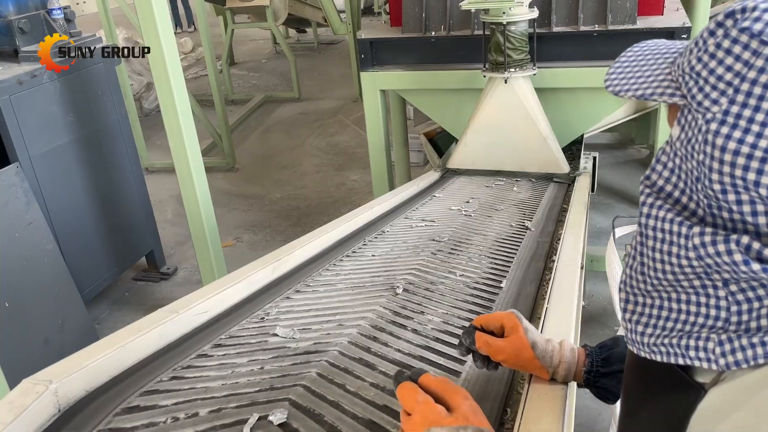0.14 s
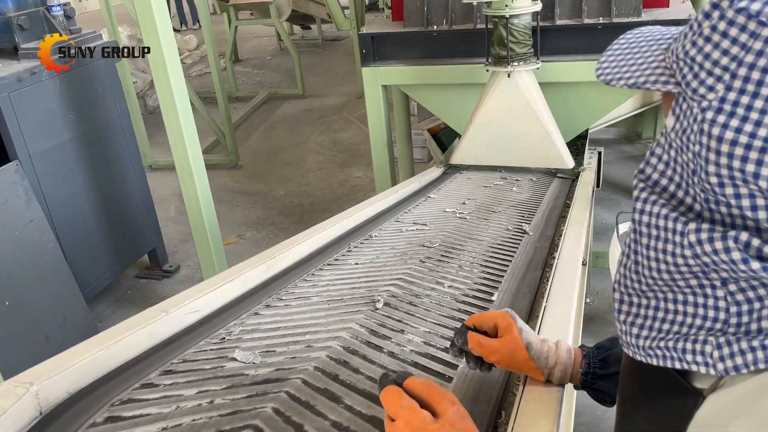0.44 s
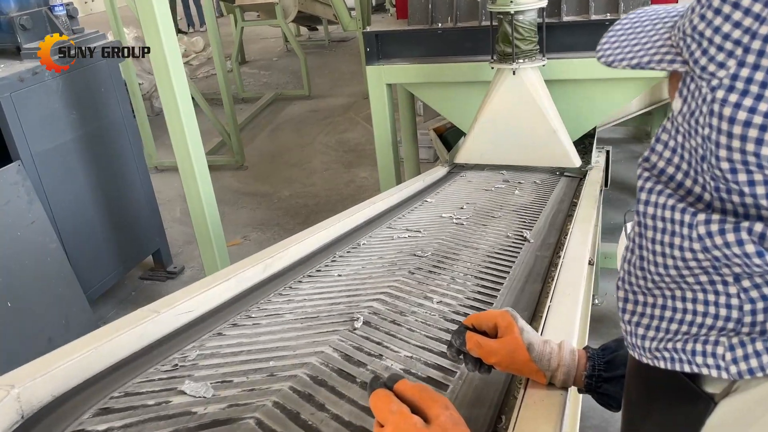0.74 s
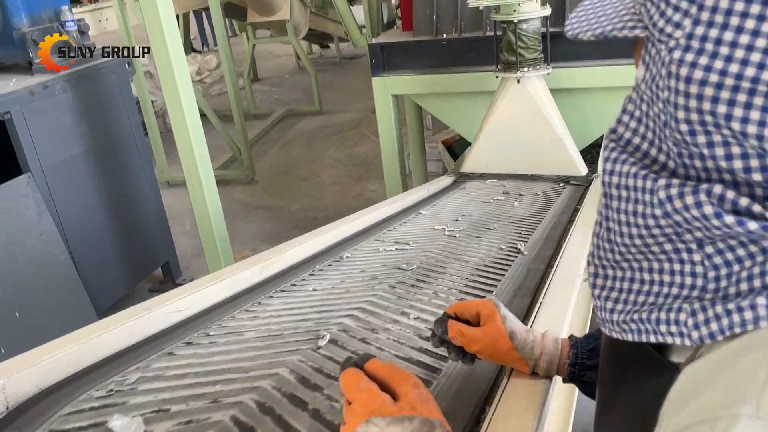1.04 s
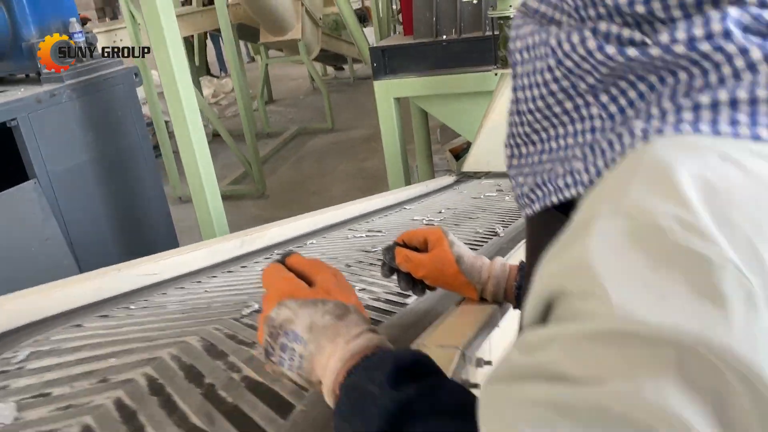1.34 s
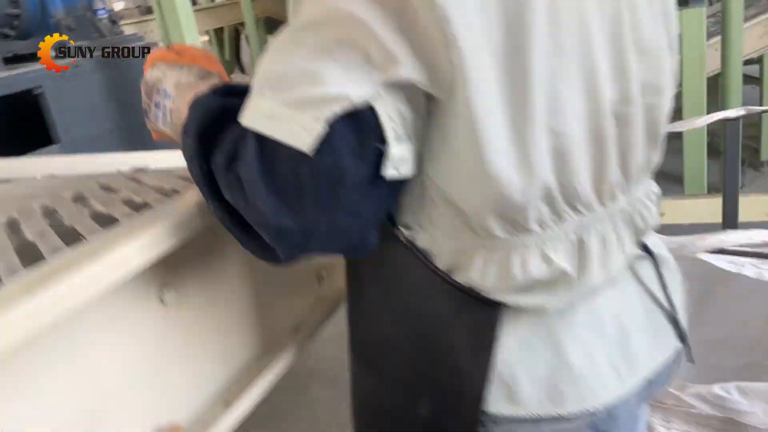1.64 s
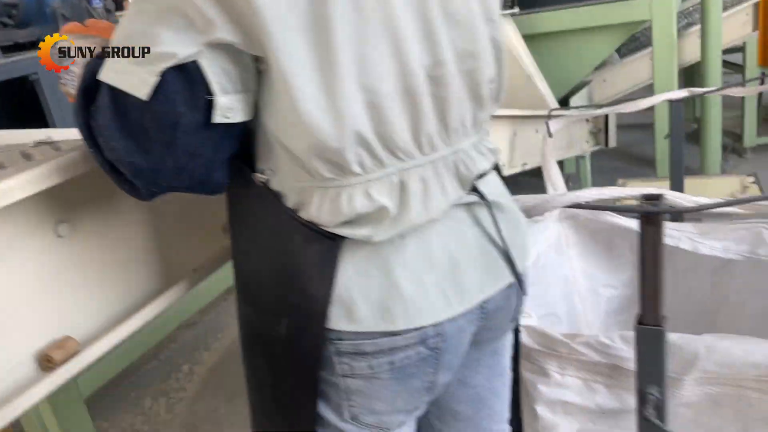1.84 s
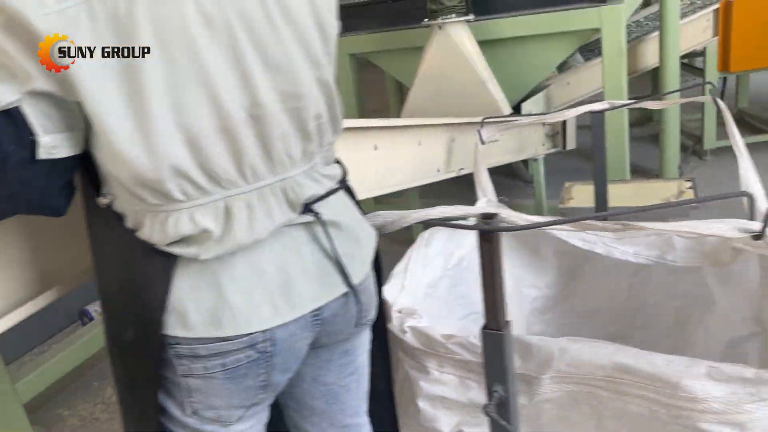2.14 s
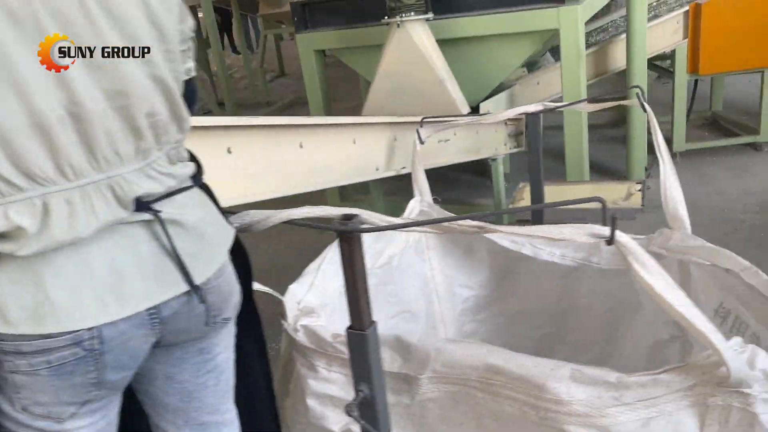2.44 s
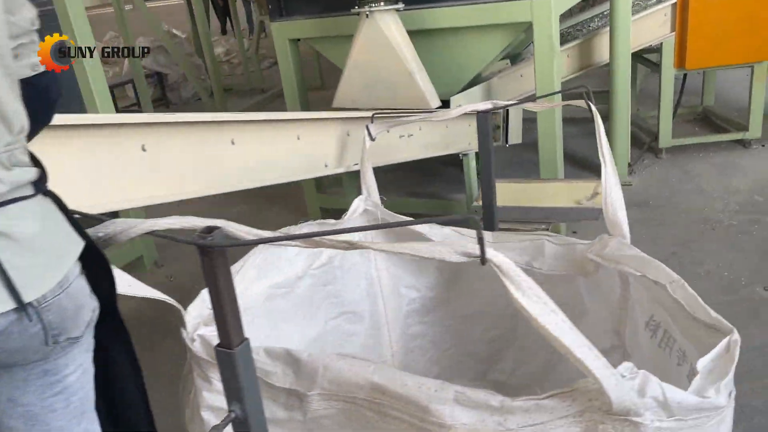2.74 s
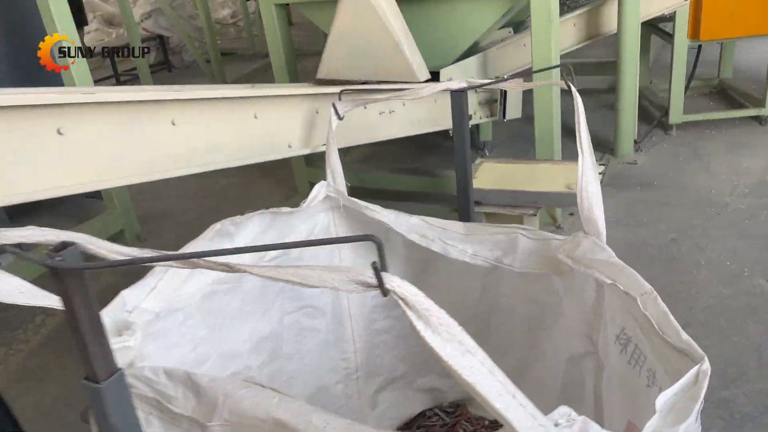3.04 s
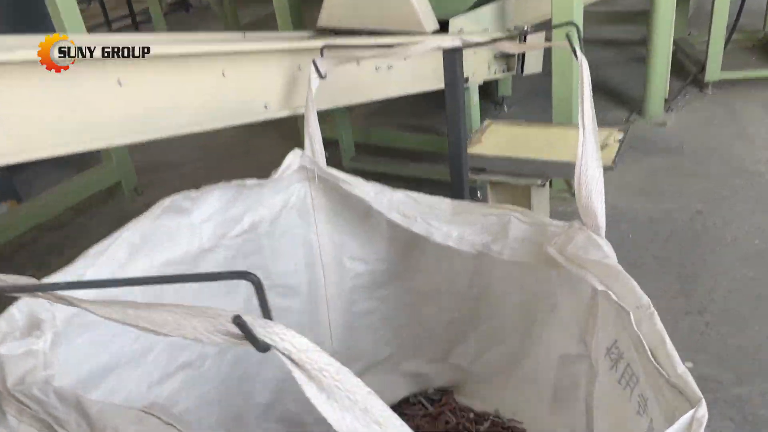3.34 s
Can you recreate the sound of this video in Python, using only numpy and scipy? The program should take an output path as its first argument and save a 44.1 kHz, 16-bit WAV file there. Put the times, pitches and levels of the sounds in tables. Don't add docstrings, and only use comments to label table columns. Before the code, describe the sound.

Metal pieces rattle and clang down a sorting line while motors hum and roar behind

```python
import sys
import numpy as np
from scipy import signal
from scipy.fft import rfft, irfft, next_fast_len
from scipy.io import wavfile
from scipy.ndimage import uniform_filter1d, map_coordinates

SR = 44100
rng = np.random.default_rng(int(sys.argv[2]) if len(sys.argv) > 2 else 0)


def wrap_up_sound(samples):
    columns = np.atleast_2d(samples).T
    tamed = np.clip(columns, -1, 1)
    steps = np.round(tamed * 32767).astype(np.int16)
    wavfile.write(sys.argv[1], SR, steps)


def convert_level_to_amplitude(level_db):
    exponent = np.asarray(level_db, float) / 20
    return 10 ** exponent


N = 154350
TIME_S = np.arange(N) / SR


def rms_one(x):
    return x / np.sqrt(np.mean(x ** 2) + 1e-20)


def at_hz(points, hz):
    table = np.array(points)
    return np.interp(np.log(hz), np.log(table[:, 0]), table[:, 1])


def drift(rate_hz):
    r = np.exp(-80 * np.pi * rate_hz / SR)
    noise = rng.standard_normal(N // 40 + 2002)
    slow = signal.lfilter([1], [1, -2 * r, r * r], noise)[2000:]
    return np.interp(np.arange(N) / 40, np.arange(len(slow)), rms_one(slow - slow.mean()))


def ring(x, hz, width_hz):
    r = np.exp(-np.pi * width_hz / SR)
    poles = [1, -2 * r * np.cos(2 * np.pi * hz / SR), r * r]
    return signal.lfilter([(1 - r * r) / 2, 0, (r * r - 1) / 2], poles, x)


def high_pass(x, hz):
    return signal.sosfilt(signal.butter(2, hz, "high", fs=SR, output="sos"), x)


# (time [s], tinkle level [dB], clank level [dB], pour length [s])
BATCHES = [(-.05, -5, 0, 0.068), (.03, -10, -2.5, 0.023), (.1, -17, -10, 0.044), (.17, -21, -6, 0.073),
           (0.296, -1.5, -5, 0.046), (.23, -19, -5, 0.032), (.33, -9, -4, 0.025), (.41, -0.5, -2.5, 0.084),
           (.48, -8, 3.5, 0.022), (0.578, 0, 2.5, 0.081), (.74, -7.5, -1.5, 0.034), (0.887, -2, 2, 0.054),
           (.93, 0, -2, 0.033), (1.072, -2.5, 2, 0.071), (1.15, -1, -1.5, 0.09), (1.26, -20, -6, 0.043),
           (1.40, -5, 2, 0.043), (1.48, -5, 0, 0.059), (1.54, -2.5, -2, 0.056), (1.65, -2, -1, 0.074),
           (1.72, -9, 1, 0.1), (1.91, -3.5, 2.5, 0.049), (2.171, -5.5, 1, 0.1), (2.24, -2.5, -0.5, 0.078),
           (2.33, 1, -3, 0.061), (2.493, 5, 2, 0.029), (2.526, 1.5, 3, 0.042), (2.595, -2.5, 1, 0.033),
           (2.725, 4, 4.5, 0.019), (2.75, -2.5, 3.5, 0.034), (3.018, -3, -1.5, 0.076),
           (3.18, 3, -2.5, 0.044), (3.255, -7, 4, 0.042), (3.40, -6, -10, .1)]
POUR_FADE_S = 0.02


def shower(column, rise_s):
    power = np.zeros(N)
    for batch in BATCHES:
        age_s = np.maximum(TIME_S - batch[0], 0)
        rise = (1 - np.exp(-age_s / rise_s)) ** 2
        fade = np.exp(-np.maximum(age_s - batch[3], 0) / POUR_FADE_S)
        power += convert_level_to_amplitude(2 * batch[column]) * rise * fade
    return np.sqrt(power)


PIECES_PER_S, SIZE_SPREAD_DB = 18000, 4
PIECE_SWING_DB, PIECE_CHANGE_S = 3.5, 0.04


def scrap(strength, colour, ring_cycles, count):
    size_db = SIZE_SPREAD_DB * np.minimum(rng.exponential(1, N), 4)
    impacts = convert_level_to_amplitude(size_db) * rng.choice([-1, 1], N)
    landed = rng.random(N) < PIECES_PER_S / SR
    clicks = impacts * landed * strength + 1e-18

    struck = rng.integers(0, count, N)
    spell = (TIME_S / PIECE_CHANGE_S + struck / count).astype(int)
    swing = convert_level_to_amplitude(PIECE_SWING_DB * rng.standard_normal((400, count)))
    clicks = clicks * swing[np.minimum(spell, 399), struck]

    pitches_hz = np.geomspace(colour[0][0], colour[-1][0], count) * rng.uniform(0.97, 1.02, count)
    rings = np.zeros(N)
    for k, hz in enumerate(pitches_hz):
        rings += convert_level_to_amplitude(at_hz(colour, hz)) * ring(clicks * (struck == k), hz, 2 * hz / ring_cycles)
    return rms_one(rings) * np.sqrt(np.mean(strength ** 2))


WAVER_S, WAVER_RATE_HZ = 0.0016, 2.5


def waver(x):
    read_at = np.arange(N) + WAVER_S * SR * drift(WAVER_RATE_HZ)
    return map_coordinates(x, [read_at], order=3, mode="nearest")


# (frequency [Hz], level [dB])
TINKLE_COLOUR = [(2500, 1.5), (4000, -1), (5500, -1.5), (7000, -2.5), (9000, -6.5), (12000, -13),
                 (16000, -30)]
# (frequency [Hz], level [dB])
CLANK_COLOUR = [(600, 6), (950, 10), (1400, 5.5), (2500, 4.5), (4000, 5), (5500, -1.5), (7500, -18)]
TINKLE_DB, TINKLE_RISE_S, TINKLE_CYCLES = -31, 0.00067, 43
CLANK_DB, CLANK_RISE_S, CLANK_CYCLES = -30, 0.0045, 37.4


def falling_scrap():
    light, heavy = shower(1, TINKLE_RISE_S), shower(2, CLANK_RISE_S)
    sides = []
    for _ in range(2):
        tinkles = convert_level_to_amplitude(TINKLE_DB) * scrap(light, TINKLE_COLOUR, TINKLE_CYCLES, count=44)
        clanks = convert_level_to_amplitude(CLANK_DB) * scrap(heavy, CLANK_COLOUR, CLANK_CYCLES, count=40)
        sides.append(waver(tinkles + clanks))
    return np.array(sides)


# (time [s], level [dB], pitch [Hz])
LARGE_PIECES = [(0.477, -35.0, 1850), (0.483, -39, 2885), (0.576, -33.0, 2606), (0.582, -29.5, 2190),
                (0.585, -28.5, 883), (0.605, -39, 3800), (0.623, -39, 3445), (0.628, -32, 2565),
                (0.643, -33, 1860), (0.756, -32, 558), (0.892, -34, 1510), (0.907, -32, 4000),
                (0.919, -40, 3445), (0.936, -36, 1658), (0.951, -28, 1148), (1.023, -30, 405),
                (1.2, -32, 2530), (1.613, -32, 2630), (1.673, -33, 2778), (1.694, -31.5, 1857),
                (1.821, -27, 381), (1.958, -32, 1981), (1.978, -31, 1360), (2.236, -34, 3359),
                (2.273, -33, 1800), (2.322, -32, 1766), (2.329, -32, 1056), (2.364, -37.0, 4479),
                (2.379, -32.5, 1073), (2.48, -30.5, 2850), (2.495, -36.0, 3854), (2.5, -37, 3144),
                (2.512, -34.0, 1905), (2.517, -33, 1766), (2.526, -35.0, 4544), (2.529, -28, 1264),
                (2.532, -32, 866), (2.541, -34.0, 3630), (2.541, -31.0, 1052), (2.541, -26, 1442),
                (2.553, -34.0, 3467), (2.567, -32, 4220), (2.595, -28.5, 1706), (2.595, -33, 1554),
                (2.599, -28.0, 996), (2.622, -30, 2400), (2.672, -33.0, 2070), (2.73, -27, 1077),
                (2.737, -36, 3230), (2.75, -36, 2476), (2.752, -41, 2710), (2.756, -34.0, 1533),
                (2.766, -36, 3058), (3.193, -31, 1538), (3.249, -28.5, 1257), (3.287, -40, 847),
                (3.299, -34.0, 1946), (3.339, -31, 1227),
                (0.033, -37, 755), (0.051, -33.0, 578), (0.112, -27.5, 389.5), (0.469, -29, 465),
               (0.541, -31.0, 500), (0.567, -35, 783), (0.602, -36, 690), (0.623, -31, 394),
               (0.649, -36, 660), (0.66, -32, 451), (0.73, -33.0, 782), (0.916, -33.0, 507),
               (0.919, -27, 247), (0.933, -31.5, 399), (0.939, -33.0, 793), (0.948, -33.0, 743),
               (1.067, -33, 328), (1.142, -30.5, 643), (1.427, -32.5, 538), (1.577, -32.5, 767),
               (1.647, -36, 626), (1.656, -34, 670), (1.717, -28.5, 364), (1.731, -32.0, 480),
               (2.28, -39, 633), (2.567, -31, 561), (2.596, -32.5, 299), (2.611, -31.5, 578),
               (2.738, -35.5, 717), (3.249, -33.5, 550), (3.354, -31, 280)]
CLANG_DB, CLANG_RISE_S, CLANG_FADE_S = 1, 0.0045, 0.017
PARTNER_SHARE, PARTNER_GAP = 0.15, 0.043


def clangs():
    t, out = np.arange(int(.25 * SR)) / SR, np.zeros(N + SR)
    shape = (1 - np.exp(-t / CLANG_RISE_S)) ** 2 * np.exp(-t / CLANG_FADE_S)
    shape /= shape.max()
    for s, db, hz in LARGE_PIECES:
        phase, split = rng.random(2)
        partner_hz = hz * (1 + PARTNER_GAP * (split + .5))
        modes = np.sin(2 * np.pi * (hz * t + phase)) + PARTNER_SHARE * np.sin(2 * np.pi * partner_hz * t)
        start = int(s * SR)
        out[start:start + len(t)] += convert_level_to_amplitude(db + CLANG_DB) * shape * modes
    return out[:N]


# (time [s], level [dB])
FIRST_CHIPS = [(0.1745, -31), (0.2972, -31), (0.4604, -30), (0.5811, -29), (0.9253, -30), (1.1912, -35),
               (1.4107, -33), (1.6447, -28), (1.6836, -33), (1.9525, -31), (2.2368, -27), (2.3106, -31),
               (2.4947, -27), (2.7242, -28), (3.0131, -29), (3.1817, -27)]
TICK_DB, TICK_FADE_S, TICK_CUT_HZ = -6, 0.014, 4500


def ticks():
    hits = np.zeros(N)
    s, db = np.transpose(FIRST_CHIPS)
    hits[(s * SR).astype(int)] = convert_level_to_amplitude(db + TICK_DB)
    shape = signal.lfilter([1], [1, -np.exp(-1 / (TICK_FADE_S * SR))], hits + 1e-18)
    return shape * high_pass(rng.standard_normal(N), TICK_CUT_HZ)


# (time [s], level [dB], pitch [Hz])
HOPPER_LUMPS = [(0.499, -17, 152.4), (.65, -20, 150), (1.08, -26, 69), (1.359, -20, 190),
                (1.721, -20, 117.4), (1.919, -16.5, 114), (2.249, -15.5, 74), (2.589, -19.5, 210.6),
                (2.76, -23, 133), (2.791, -15, 72.5), (2.799, -15, 137.4), (3.099, -15.5, 87.5),
                (3.269, -18, 113), (3.331, -19, 291), (0.061, -18, 201), (.5, -20, 201), (0.793, -21, 118),
                (1.008, -24, 126), (1.03, -30, 195), (1.14, -30, 197), (1.211, -30, 202), (1.267, -24, 95),
                (1.272, -20, 195), (1.351, -17, 147), (1.70, -19, 193.6), (1.761, -20, 70),
                (2.02, -17.5, 118), (2.1, -18, 108), (2.262, -19, 151), (2.431, -24, 108), (3.03, -25, 66)]
THUD_DB, THUD_RISE_S, THUD_FADE_S = 5, 0.011, 0.023


def thuds():
    out = np.zeros(N)
    for s, db, hz in HOPPER_LUMPS:
        age_s = np.maximum(TIME_S - s, 0)
        shape = (1 - np.exp(-age_s / THUD_RISE_S)) ** 2 * np.exp(-age_s / THUD_FADE_S)
        out += convert_level_to_amplitude(db + THUD_DB) * shape * np.sin(2 * np.pi * hz * age_s)
    return out


HALL_T60_S, HALL_DB, HALL_CUT_HZ, HALL_GAP_S = 0.84, -4.5, 5100, 0.012


def hall(x):
    t = np.arange(SR) / SR
    tails = rng.standard_normal((2, SR)) * convert_level_to_amplitude(-60 * t / HALL_T60_S) * (t > HALL_GAP_S)
    tails = signal.lfilter([1], [1, -np.exp(-2 * np.pi * HALL_CUT_HZ / SR)], tails)
    tails /= np.sqrt(np.sum(tails ** 2, axis=1, keepdims=True))
    echoes = signal.fftconvolve(x[None], tails, axes=1)[:, :N]
    return convert_level_to_amplitude(HALL_DB) * np.array([waver(side) for side in echoes])


# (frequency [Hz], density [dB per Hz])
ROAR_COLOUR = [(30, -36), (62, -2), (160, -3), (400, -8.5), (480, -10.5), (1500, -14), (5500, -23.5),
               (15000, -42.5)]
# (time [s], level [dB])
DRIVE_LOAD = [(0.0, -29), (0.48, -26.5), (0.53, -29), (0.56, -27.5), (1.05, -24), (1.69, -26.5),
              (1.71, -23.5), (2.24, -29.5), (2.27, -26), (2.32, -26), (2.6, -24), (2.68, -25),
              (2.84, -20.5), (2.88, -28.5), (3.37, -24), (3.5, -35)]
ROAR_DB, PATCH_DB, PATCH_RATE_HZ = -24, 1.53, 6.86
LOAD_REACH_HZ, EVEN_SHARE, EVEN_CYCLES = 229, 0.91, 6.6


def roar():
    load_db = np.interp(TIME_S, *np.transpose(DRIVE_LOAD))
    load_db -= load_db.mean()
    out, edges_hz = 0, 27 * 2 ** np.arange(0, 9.6, .5)
    white = rng.standard_normal((2, 2, N + 8000))
    for k, (low, high) in enumerate(zip(edges_hz, edges_hz[1:])):
        sos = signal.butter(2, [low, high], "band", fs=SR, output="sos")
        band = signal.sosfilt(sos, white[k % 2])[:, -N:]
        hz = np.sqrt(low * high)
        share = 1 / (1 + (hz / LOAD_REACH_HZ) ** 4)
        swell = uniform_filter1d(band[0] ** 2, int(EVEN_CYCLES * SR / hz))
        band = band * (swell / swell.mean() + 0.07) ** (-EVEN_SHARE * share / 2)
        level_db = at_hz(ROAR_COLOUR, hz) + share * load_db + PATCH_DB * drift(PATCH_RATE_HZ)
        out = out + band * convert_level_to_amplitude(level_db)
    return convert_level_to_amplitude(ROAR_DB) * rms_one(out)


# (frequency [Hz], level [dB rms], wobble width [Hz])
MACHINE_TONES = [
    (64.2, -45.5, 4.9),
    (150, -39.5, 7.9),
    (198.9, -46.5, 4),
    (371.4, -47.5, 11.5),
    (2002, -44.5, 2.6),
    (2060, -40, 13),
]


def tones():
    white, out = rng.standard_normal(N + SR), np.zeros(N)
    for hz, db, width_hz in MACHINE_TONES:
        line = ring(ring(white, hz, width_hz), hz, width_hz)[SR:]
        out += convert_level_to_amplitude(db) * rms_one(line)
    return out


# (frequency [Hz], likeness [0-1], left lead [rad], left minus right [dB])
PORT_PAIR = [(60, 0.99, 0, -3.5), (246, 0.84, 0.18, -3), (1070, 0.14, -0.23, -2.5), (2370, 0.13, -0.02, 0),
             (4980, 0.64, 1, 4), (8830, 1, -4, -1), (11900, 0.87, -7, 0.8), (15600, .93, -9.5, -0.5)]


def ports(pair):
    size = next_fast_len(N + 256)
    first, second = rfft(pair, size)
    hz, table = np.arange(len(first)) * SR / size, np.array(PORT_PAIR)
    alike, lead_rad, balance_db = (np.interp(hz, table[:, 0], table[:, k]) for k in (1, 2, 3))
    alike = np.clip(alike, 0, 1)
    right = (alike * first + np.sqrt(1 - alike ** 2) * second) * np.exp(-1j * lead_rad)
    return irfft([first * convert_level_to_amplitude(balance_db / 2), right * convert_level_to_amplitude(-balance_db / 2)], size)[:, :N]


def scene():
    metal = falling_scrap() + clangs()
    echoes = hall(metal[0])
    steady = roar() + (tones() + thuds()) * [[1], [0]]
    return ports(metal + echoes + ticks() + steady)


def band_limit(x):
    return signal.sosfilt(signal.butter(12, 15700, fs=SR, output="sos"), x)


def record(dry):
    return band_limit(dry)


dry = scene()
out = record(dry)
wrap_up_sound(out)
```